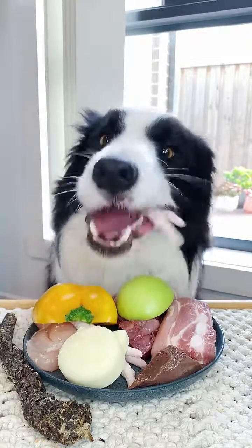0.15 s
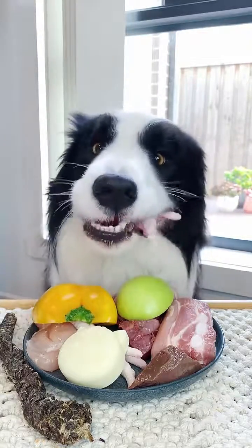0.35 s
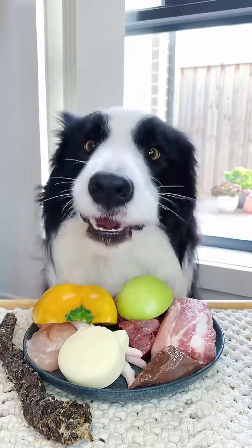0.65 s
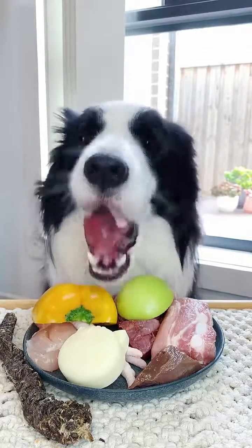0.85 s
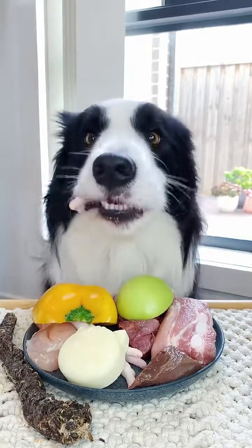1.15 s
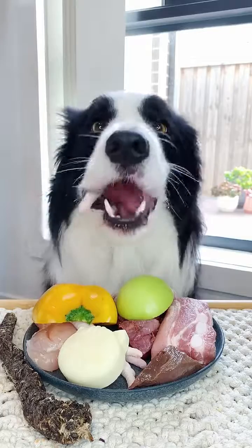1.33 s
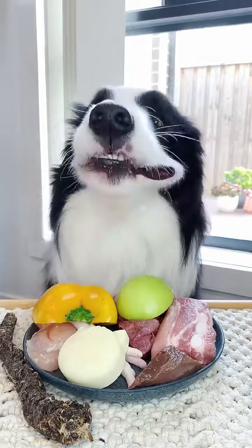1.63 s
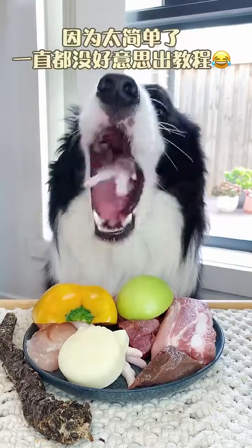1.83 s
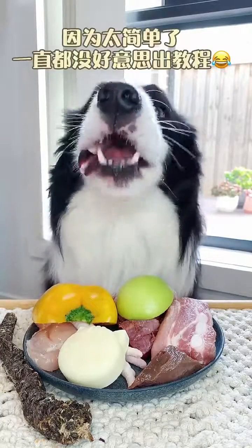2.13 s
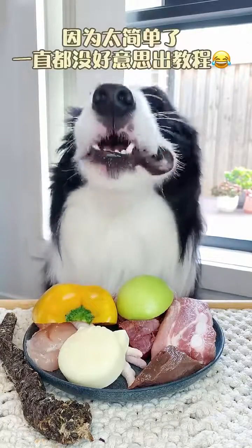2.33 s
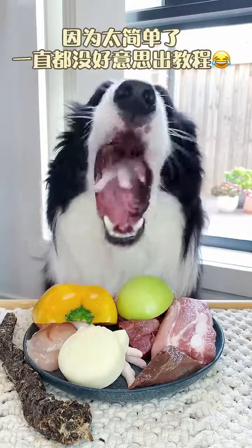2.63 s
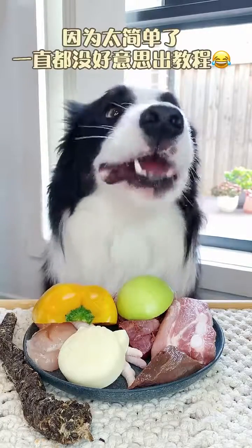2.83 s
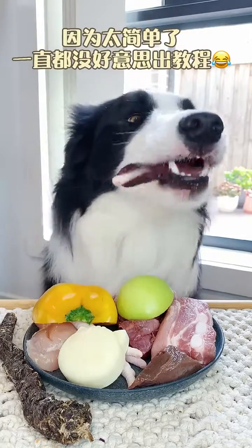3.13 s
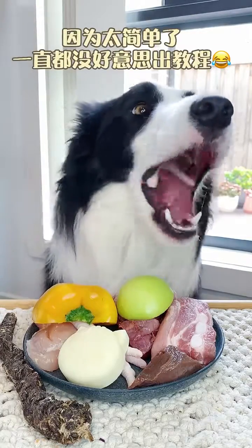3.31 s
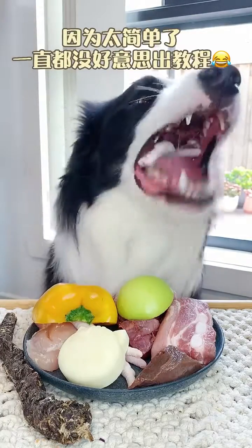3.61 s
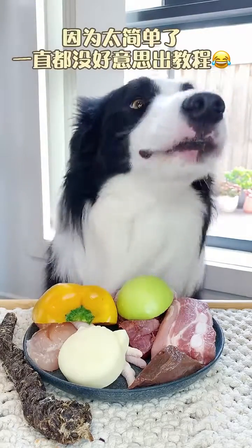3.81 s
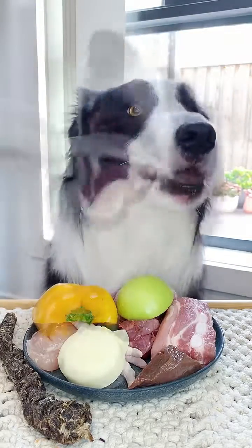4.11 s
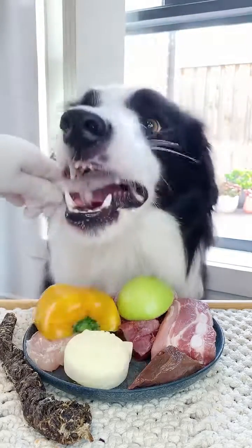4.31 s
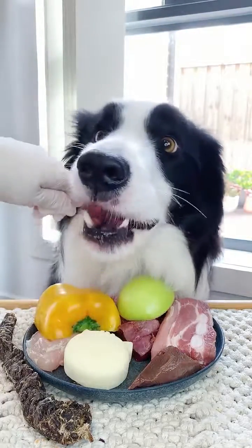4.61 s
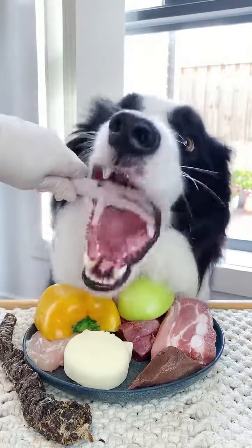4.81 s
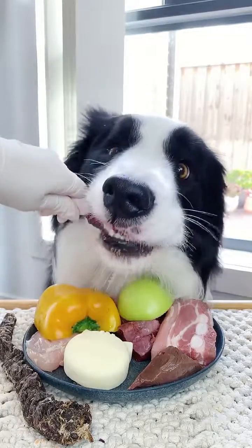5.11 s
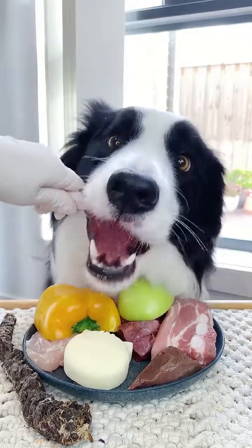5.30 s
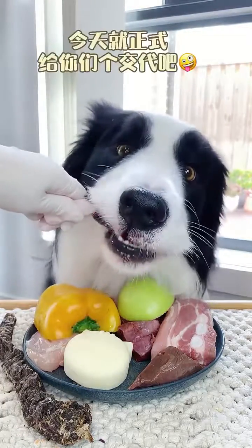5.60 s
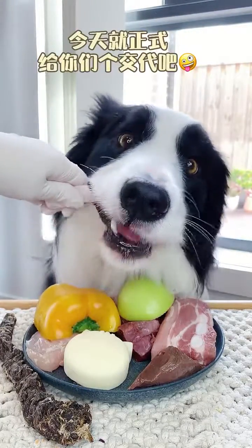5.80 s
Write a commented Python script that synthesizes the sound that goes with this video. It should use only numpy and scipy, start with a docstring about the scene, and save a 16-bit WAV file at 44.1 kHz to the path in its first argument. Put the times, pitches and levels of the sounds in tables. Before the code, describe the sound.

A dog eats raw meaty bone indoors, mouth almost against the microphone. Rapid wet cracks come in irregular clusters, with hard snaps early and near one second, then steady crunching through the middle. Low jaw thuds and rumbles shake the microphone, saliva crackles and squelches, and nose breath hisses between bites. Loud open-mouth cracks ring briefly off hard walls. The last second has a few bright snaps.

```python
"""Dog chewing raw meat and bones

Indoors, with one microphone very close to the dog's head. Bone and gristle crack as damped rings and
noise bursts; the jaw rumbles and thuds as low noise and low rings. Air through the nose is filtered noise,
wet tissue crackles in small pops, slurps are runs of bubbles and whistles are gliding sines.
Cracks made with the mouth open fill the hard-walled room; a limiter squeezes loud moments."""
import sys
import numpy as np
from scipy import signal
from scipy.fft import rfft, irfft, next_fast_len
from scipy.io import wavfile
from scipy.ndimage import uniform_filter1d, minimum_filter1d, map_coordinates

SR = 44100
rng = np.random.default_rng(int(sys.argv[2]) if len(sys.argv) > 2 else 0)


def invert_db(level):
    """Linear amplitude ratio for a level in decibels (20 dB per decade), elementwise."""
    return 10 ** (np.asarray(level, dtype=float) / 20)


def wav_record(signal):
    """Record a signal, one row per channel, as 16-bit PCM in the file named by sys.argv[1]."""
    frames = np.transpose(np.atleast_2d(signal))
    bounded = np.clip(frames, -1, 1)
    # unit amplitude maps onto the largest positive 16-bit level
    quanta = np.round(bounded * 32767).astype(np.int16)
    wavfile.write(sys.argv[1], SR, quanta)


N = 262395


def unit(x):
    """Scale to rms 1."""
    return x / np.sqrt(np.mean(x ** 2) + 1e-20)


def curves(rows):
    """One value per sample for each column after the time."""
    s, *columns = np.transpose(rows)
    return [np.interp(np.arange(N) / SR, s, column) for column in columns]


def wobble(rate):
    """A smooth random curve, rate knots a second."""
    knots = rng.standard_normal(int(N * rate / SR) + 4)
    return map_coordinates(knots, [np.arange(N) * rate / SR])


def spans(s, end):
    """1 from s to end, with 4 ms edges."""
    return np.interp(np.arange(N) / SR, [s - .004, s, end, end + .004], [0, 1, 1, 0])


def coloured(x, spectrum):
    """x filtered by (Hz, dB) points on a log frequency axis."""
    size = next_fast_len(x.shape[-1] + 8192)
    hz, db = np.transpose(spectrum)
    bins = np.fft.rfftfreq(size, 1 / SR)
    gain = invert_db(np.interp(np.log(bins + 1), np.log(hz + 1), db))
    return irfft(rfft(x, size) * gain, size)[..., :x.shape[-1]]


def rush(spectrum, depth):
    """Noise of rms 1 with shallow patches of random gain in time and frequency, depth in dB rms."""
    z = signal.stft(rng.standard_normal(N + 512), nperseg=256)[2]
    field = uniform_filter1d(rng.standard_normal(z.shape), size=4, axis=0)
    field = uniform_filter1d(field, size=8, axis=1)
    patchy = signal.istft(z * invert_db(depth * unit(field)), nperseg=256)[1][:N]
    return unit(coloured(patchy, spectrum))


def rings(s, size, hz, cycles, phase, length):
    """Damped sines, one per row, that fall 60 dB in a number of cycles; summed at their times."""
    turn = hz[:, None] * np.arange(length) / SR
    decay = invert_db(-60 * turn / cycles[:, None])
    rows = size[:, None] * np.sin(2 * np.pi * turn + phase[:, None]) * decay
    at = np.round(s * SR).astype(int)[:, None] + np.arange(length)
    return np.bincount(at.ravel(), rows.ravel(), N + SR)[:N]


def grains(hz, spread, cycles, scatter_db, count, length):
    """Random small pops, together of rms 1: log-normal pitch, a few much bigger than the rest."""
    when, chance, sign = rng.random((count, 3)).T
    pitch = np.clip(hz * np.exp(spread * rng.standard_normal(count)), 60, 15000)
    size = invert_db(-scatter_db * np.log(chance + .03))
    phase = np.pi * np.round(sign)  # either polarity
    return unit(rings(when * N / SR, size, pitch, np.full(count, cycles), phase, length))


def swells(s, db, rise_s, fall_s, base_db):
    """Level in dB of a base plus swells that rise and fall by 20 dB in 1 ms more than the given times."""
    t = np.arange(0, N + 64, 64) / SR
    late = t - s[:, None]
    rise = np.reshape(rise_s + 1e-3, (-1, 1))
    down = np.where(late < 0, -late / rise, late / (fall_s + 1e-3))
    power = (invert_db(db[:, None] - 20 * down) ** 2).sum(axis=0)
    return 10 * np.log10(np.interp(np.arange(N) / SR, t, power) + invert_db(base_db) ** 2)


# Swells of low rumble at the close microphone. Each row: time of the peak in seconds,
# level in dB, rise time over 20 dB in seconds (clipped to 0.02-0.25 s).
RUMBLE_SWELLS = [(.09, -21, .08), (.18, -15, .05), (0.239, -21, -1.7), (.565, -19, -1.5), (.68, -13, 5),
                 (.885, -12, -0.3), (.96, -19, -1), (1.003, -10.5, 0), (1.05, -18, .05), (1.481, -16, -6),
                 (1.564, -15.5, .12), (1.849, -13, -1.3), (1.941, -10.5, -1.5), (1.995, -13.5, 0.2),
                 (2.26, -21, -1.3), (2.39, -13, .2), (2.66, -13.5, -1.1), (2.734, -8.5, 0),
                 (2.96, -17, -0.2), (3.025, -7.5, 0.1), (3.418, -6.5, -0.1), (3.59, -10, -0.06),
                 (3.64, -13.5, 0.4), (3.688, -8, .1), (3.83, -14, -0.1), (3.89, -14.5, 3), (3.96, -19, 0.5),
                 (4.119, -9.5, .15), (4.22, -12.5, -1), (4.32, -9.5, 0.5), (4.41, -18, -0.4),
                 (4.83, -15, -0.1), (4.89, -11, -0.8), (4.93, -9.5, 13), (5.0, -17.5, 11), (5.14, -23, 2.5),
                 (5.429, -7.5, .2), (5.6, -16.5, .2), (5.85, -23.5, -7)]
RUMBLE_FALL_S, RUMBLE_BASE_DB = 0.052, -33.5  # time to fall 20 dB, level under the swells


def rumble_level():
    """Jaw rumble level in dB: overlapping swells above a faint steady base."""
    s, db, rise_s = np.transpose(RUMBLE_SWELLS)
    return swells(s, db, np.clip(rise_s, .02, .25), RUMBLE_FALL_S, RUMBLE_BASE_DB)


# Thuds of the jaw, close to the microphone. Each row: start in seconds, relative level in dB, pitch in Hz.
THUDS = [(0.232, -9, 184), (0.658, -17.5, 248), (0.74, -14, 440), (0.882, -15.5, 236), (1.035, -9.5, 207),
         (1.133, -8.5, 274), (1.176, -14.5, 503), (1.344, -16.5, 403), (1.628, -17, 377), (1.841, -10, 243),
         (2.046, -10, 262), (2.091, -15, 280), (2.373, -12.5, 173), (2.725, -11, 227), (2.745, -10.5, 137),
         (3.007, -9.5, 123), (3.146, -6.5, 252), (3.175, -14.5, 275), (3.675, -16, 178),
         (3.713, -14.5, 290), (3.773, -9.5, 262), (3.81, -13.5, 250), (3.884, -12.5, 340),
         (3.947, -15.5, 168), (4.205, -14.5, 146), (4.337, -12.5, 270), (4.402, -6.5, 242),
         (4.537, -11.5, 350), (4.969, -18, 168), (4.993, -16, 153), (5.009, -11.5, 244), (5.109, -12, 324),
         (5.128, -12.5, 270), (5.15, -14, 415), (5.429, -10, 103), (5.662, -16, 400), (5.846, -21, 119)]
# Spectrum of the microphone being shaken. Each row: frequency in Hz, relative level in dB per Hz.
RUMBLE = [(7.1, -25), (12, 3.5), (29, -1), (58, -4.5), (108, -18.5), (239, -29), (300, -84), (660, -120)]


def jaw():
    """The working jaw shakes the microphone in slow lumps; teeth closing on meat give short thuds."""
    s, db, hz = np.transpose(THUDS)
    thuds = rings(s, invert_db(db + 7), hz, np.full(len(s), 6.5), np.full(len(s), np.pi), length=3000)
    rumble = rush(RUMBLE, depth=0)
    # the rumble's own random swings in level are evened out
    rumble /= np.sqrt(0.11 + uniform_filter1d(rumble ** 2, size=2000))
    return invert_db(rumble_level()) * unit(rumble) + thuds


# Moments when the room's ring, air and hiss drop away. Each row: start in seconds, end in seconds,
# change in dB.
DIPS = [(0.115, 0.145, -12), (1.086, 1.109, -9.5), (1.415, 1.477, -5), (2.454, 2.517, -7.5),
        (2.764, 2.925, -4), (3.417, 3.546, -13), (3.693, 3.704, -20), (3.952, 4.075, -7.5),
        (4.345, 4.362, -8.5)]


def dips():
    """The brief drops in level, dB."""
    return sum(db * spans(s, end) for s, end, db in DIPS)


# Breath at the muzzle between the breaks. Each row: time in seconds, relative airflow level in dB,
# relative hiss level in dB.
BREATH = [(0.0, -24.5, -46), (0.36, -30.5, -38.5), (0.76, -32.5, -53), (1.21, -26, -46), (1.85, -35, -49.5),
          (2.22, -25, -40), (2.73, -32, -46), (3.0, -27, -37), (3.17, -33, -55), (3.46, -24, -35.5),
          (3.69, -37.5, -42.5), (4.09, -28, -43.5), (4.37, -27, -34.5), (4.72, -28.5, -40),
          (5.07, -33, -37), (5.3, -32, -46.5), (5.72, -33, -44), (5.95, -33, -45.5)]
# swells around each crack: level against the crack, then 20 dB rise and fall times
AIR_SWELL_DB, AIR_RISE_S, AIR_FALL_S = -14, 0.016, 0.014
HISS_SWELL_DB, HISS_RISE_S, HISS_FALL_S = -11, 0.018, 0.041


def flow():
    """Air and hiss levels in dB: the breath, plus airy noise and hiss that swell around each crack."""
    s, db, hz, treble_db = np.transpose(CRACKS)
    air_db, hiss_db = curves(BREATH)
    air_db = swells(s, db + AIR_SWELL_DB, AIR_RISE_S, AIR_FALL_S, air_db + 2.0)
    hiss_db = swells(s, db + treble_db + HISS_SWELL_DB, HISS_RISE_S, HISS_FALL_S, hiss_db + 5.5)
    return air_db + dips(), hiss_db + dips()


# Spectra at the close microphone: air in the nose, hiss of air and spit, squelching flesh.
# Each row: frequency in Hz, relative level in dB per Hz.
NOSE = [(290, -28), (500, -21), (795, -40), (938, -1), (1440, 4.5), (2590, 8.5), (3570, 9), (5680, -16),
        (7000, 4), (9100, -50), (15400, -120)]
HISS = [(3500, -38), (4290, 0.5), (6120, -3.5), (7130, -2), (10800, -18), (15100, -18), (16000, -32)]
FLESH = [(53, -8), (90, 19), (172, 1.5), (249, 12.5), (400, 0.5), (658, -12), (1100, -12), (1430, -7.5),
         (2420, -120)]


def breath_and_spit():
    """Air rushes through nose and mouth; saliva and tissue crackle with it and squelch with the rumble."""
    air_db, hiss_db = flow()
    wet_db = 0.71 * rumble_level() + 0.32 * air_db - 9.5
    puff_db = 2 * wobble(35) + 2 * wobble(9)
    air = invert_db(air_db - 15.5 + puff_db) * rush(NOSE, depth=2)
    hiss = invert_db(hiss_db - 11.0 + puff_db) * rush(HISS, depth=0.85)
    squelch = invert_db(wet_db + 3 * wobble(40)) * rush(FLESH, depth=1.5)
    crackle = grains(hz=2100, spread=0.4, cycles=11, scatter_db=5, count=3500, length=260)
    # a bursting film of saliva also ticks in the treble
    ticks = invert_db(hiss_db - 4.5) * unit(np.abs(crackle) * rush(HISS, depth=0))
    smacks = grains(hz=930, spread=0.463, cycles=9.3, scatter_db=3.5, count=2500, length=400)
    smacks *= invert_db(wet_db - 7.0)
    return air + hiss + squelch + invert_db(air_db - 6.5) * crackle + ticks + smacks


# Breaks of bone and gristle inside the mouth. Each row: time in seconds, relative level in dB,
# mouth ring in Hz, splinter treble in dB against that level.
CRACKS = [(0.031, -16, 1860, -12), (0.0517, -15.5, 1960, -25), (0.071, -11, 2460, -21),
          (0.0858, -2, 1220, -22), (0.0942, -12.5, 1110, -35), (0.1182, -3.5, 1470, -40),
          (0.1738, -9, 1670, -17), (0.204, -14.5, 1800, -24), (0.2338, -3.5, 2200, -17.5),
          (0.2692, -16.5, 2090, -5.5), (0.296, -11, 3820, -41), (0.308, -14, 2100, -2),
          (0.326, -14.5, 1510, -9), (0.347, -8, 1950, -5), (0.355, 3, 3200, -22), (0.3654, -15, 2200, -9),
          (0.3724, -23, 2280, 6), (0.379, -7, 2540, -7), (0.386, 4, 2260, -18), (0.3906, -3, 4200, -49),
          (0.563, -6, 1200, -65), (0.6774, -13.5, 1490, -36), (0.732, -10.5, 2040, -25),
          (0.7399, -13.5, 1270, -26), (0.8049, -7, 1530, -28), (0.886, -9.5, 1090, -74),
          (0.9507, -18, 1170, -9), (0.9957, -13.5, 1230, -10), (1.0529, -1, 4250, -21),
          (1.085, -10, 2310, -18), (1.1235, 0, 3950, -35), (1.132, -6, 1130, -8), (1.1913, 2, 3660, -47),
          (1.1986, 0, 3500, -43), (1.2502, -10, 950, -31), (1.3489, -10.5, 3300, -51),
          (1.404, -5, 1060, -3.5), (1.416, -2, 1120, -23), (1.501, -14.5, 2370, 1.5),
          (1.5094, -0.5, 1500, -26), (1.564, -11, 1800, -16), (1.596, -2.5, 1780, -12.5),
          (1.612, -8, 1520, -44), (1.6384, -3, 1527, -18), (1.6582, -11, 1370, -51),
          (1.7309, -6, 1390, -22), (1.797, -16.5, 920, -36), (1.8174, -12.5, 3770, -47),
          (1.861, -15, 5630, -1.5), (1.9377, -7, 750, -17), (1.9814, -8, 1130, -13),
          (2.0093, -1, 2040, -11.5), (2.027, -2, 2610, -12.5), (2.0465, -2.5, 2770, -17.5),
          (2.092, -10, 2690, -12), (2.2551, -10.5, 1265, -40), (2.2857, -21, 6800, 10.5),
          (2.313, -14, 814, -39), (2.324, -10, 1530, -51), (2.3716, -11, 4500, -5), (2.378, -9, 1280, -17),
          (2.4047, -4.5, 1190, -48), (2.425, -12, 4350, -25), (2.4431, -2, 1340, -28),
          (2.466, -9, 2590, -41), (2.5376, -13, 1386, 1), (2.6146, -11, 3440, -45), (2.671, -12, 696, -37),
          (2.6772, -7, 820, -55), (2.725, -12.5, 550, -21), (2.749, -11, 1450, -8.5),
          (2.919, -11.5, 1320, -37), (2.9945, -15, 1410, -7), (3.0083, -10.5, 1470, -28),
          (3.067, -3, 1390, -5.5), (3.1251, -10.5, 1300, -5), (3.143, 2.5, 2500, -9.5),
          (3.16, -6, 2600, -43), (3.2463, -16.5, 1790, 0.5), (3.315, -10, 2130, -18),
          (3.322, -10.5, 1370, -4.5), (3.54, -10, 740, -65), (3.547, -10, 2100, -48),
          (3.679, -20, 4550, -7), (3.7145, -14.5, 1290, -4), (3.719, -15, 1250, -7),
          (3.7484, -3, 1810, -7.5), (3.7658, 1, 2580, -9.5), (3.7771, -8, 1760, -27),
          (3.8115, -3.5, 2000, -18), (3.855, -8, 1050, -53), (3.8933, -13.5, 1120, -40),
          (3.9515, -2, 790, -31), (3.9821, -12.5, 1000, -77), (4.019, -15.5, 676, -47),
          (4.076, -19, 2960, -9), (4.0986, -3, 742, -19), (4.183, -15.5, 1900, -1.5),
          (4.206, -13.5, 1980, -12), (4.2263, -15.5, 1410, -10), (4.2556, -7.5, 1840, -34),
          (4.264, -20.5, 6000, 0), (4.2865, -11, 1430, -31), (4.3002, -10, 1150, -11),
          (4.312, -6, 1730, -36), (4.3354, -12.5, 1830.0, -7), (4.374, -13.5, 1840, -9.5),
          (4.4025, -10, 950, -10), (4.438, -11, 1930, -6), (4.4459, -3.5, 960, -12),
          (4.472, -5, 2000.0, -10), (4.4799, -6.5, 1950, -13), (4.51, -15, 1610, -4.5),
          (4.539, -6, 1920, -9.5), (4.731, -16, 1610, -30), (4.899, -18, 1200, -4),
          (4.943, -10.5, 970, -15), (4.9682, -14, 1380, -9), (4.9924, -16.5, 2980, -6),
          (5.0099, -16, 1420, -19), (5.04, -11.5, 1530, -4), (5.056, -18, 900, -20),
          (5.069, -9.5, 3970, -15), (5.083, -14, 2450, -9), (5.103, -1.5, 5100, -24), (5.11, -8, 4200, -22),
          (5.1234, -3, 4030, -29), (5.147, -12.5, 2000, -13), (5.176, -8.5, 3820, -21),
          (5.222, -14.5, 3730, -12.5), (5.473, -15.5, 950, -22), (5.4799, -15.5, 2980, -4),
          (5.555, 3, 4500, -11), (5.5797, 1, 4100, -22), (5.6033, -4, 3270, -10), (5.6332, -11, 2820, -21),
          (5.6618, -12, 1800, -6), (5.669, -8, 4070, -4.5), (5.7148, -10.5, 1660, -12),
          (5.7401, -8.5, 1560, -13), (5.7947, -9.5, 2730, -19)]
# Spectra of the splinters and of the body of a break, heard close.
# Each row: frequency in Hz, relative level in dB per Hz.
SPLINTER = [(2500, -13), (5000, -1.5), (8000, -0.5), (10000, -11), (15500, -20.5), (17000, -45)]
BONE = [(290, -81), (500, 13.5), (685, -10), (938, -2.5), (1270, 4), (1980, 8.5), (3950, 3), (9000, -25),
        (11700, -73), (19800, -120)]
DULL_SHARE = 0.21  # how far the snap, upper ring and body of a break follow its treble
SNAP_DB, SNAP_HZ = 5, 4200  # sharp click at the first instant of a break; centre of its random pitch


def cracks():
    """Each break rings the mouth at its present pitch and spits a short burst of splinter noise."""
    s, db, hz, treble_db = np.transpose(CRACKS)
    chance = rng.standard_normal((len(s), 4)).T
    one = np.ones(len(s))
    dull_db = DULL_SHARE * treble_db
    polarity = np.pi * (chance[0] > 0)
    mouth = rings(s, invert_db(db + 3.5), hz, 11 * (hz / 2000) ** .5, polarity, length=600)
    # the wet cavity keeps a fainter ring going for longer
    mouth += rings(s, invert_db(db - 14.0), hz, 45 * (hz / 2000) ** .5, polarity, length=1000)

    # the broken piece rings higher
    piece_hz = hz * 2.115 * np.exp(0.29 * chance[2])
    piece_size = invert_db(db + dull_db + 3 * chance[1])
    piece = rings(s, piece_size, piece_hz, 16 * one, np.pi * (chance[3] > 0), length=400)

    # wet fibres let go one by one: four smaller smacks scatter around the break, near the mouth's pitch
    lag, size, bend = rng.random((len(s), 12)).T.reshape(3, -1)
    smack_s = np.tile(s, 4) + .016 * lag - .005
    smack_size = invert_db(np.tile(db, 4) - 2.5 - 17.3 * size)
    smack_hz = np.tile(hz, 4) * np.exp(.5 * (bend - .5))
    smacks = rings(smack_s, smack_size, smack_hz, 12 + 0 * lag, 0 * lag, length=500)

    # the break also jolts the skull: one short low push
    jolt_hz = 380 * np.exp(0.41 * chance[1])
    jolt = rings(s, invert_db(db - 7.0), jolt_hz, 4.4 * one, np.pi * one, length=600)
    snap_hz = SNAP_HZ * np.exp(0.33 * chance[2])
    snap = rings(s, invert_db(db + SNAP_DB + dull_db), snap_hz, 3 * one, np.pi * one, length=60)

    # fibres start to tear 2 ms before the break, then the splinters die away
    start = np.round((s - .002) * SR).astype(int)
    t = np.arange(SR // 30) / SR - .002
    tear = 1.49 * np.exp(t / 0.00062)
    fade = np.where(t < 0, tear, invert_db(-60 * t / 0.013) + 0.14 * invert_db(-60 * t / 0.05))
    spit = signal.fftconvolve(np.bincount(start, invert_db(db + treble_db + 1.0), N), fade)[:N]
    body = signal.fftconvolve(np.bincount(start, invert_db(db - 4 + dull_db), N), fade)[:N]
    grit = unit(invert_db(5 * wobble(900)))  # the break goes fibre by fibre, not smoothly
    burst = grit * (spit * rush(SPLINTER, depth=0.93) + body * rush(BONE, depth=0.78))
    return mouth + piece + smacks + jolt + snap + burst


# Decay of the hard-walled room. Each row: frequency in Hz, time to fall 60 dB in seconds.
ROOM = [(500, 0.51), (2000, 0.95), (5000, 0.81), (9000, 0.74), (15000, 0.21)]


def room(x):
    """Each frequency of the room's answer dies at its own speed; every quarter second meets a new tail."""
    hz, t60 = np.transpose(ROOM)
    step = SR // 4
    delay = 300  # samples
    wet = np.zeros(N + 2 * SR)
    for at in range(0, N, step):
        f, t, z = signal.stft(rng.standard_normal(SR), SR, nperseg=256)
        decay = invert_db(-60 * t / np.interp(f, hz, t60)[:, None])
        tail = signal.istft(z * decay, SR, nperseg=256)[1]
        answer = signal.fftconvolve(x[at:at + step], tail / np.linalg.norm(tail))
        wet[at + delay:at + delay + len(answer)] += answer
    return wet[:N]


# How much of a crack escapes the open mouth. Each row: time in seconds, level sent to the room in dB.
MOUTH_OPENING = [(0, -37), (.26, -36), (.36, -12), (.61, -16), (1.18, -12), (1.6, -19.5), (2.02, -7.5),
                 (2.4, -19), (2.83, -15), (3.14, -9), (3.4, -9), (3.76, -19), (4.2, -43), (4.46, -10),
                 (4.9, -17), (5.12, -11.5), (5.39, -29), (5.58, -17), (5.95, -9.5)]


def escaping(near):
    """The open mouth lets the cracks out into the room, whose ring dips briefly at times."""
    return room(invert_db(curves(MOUTH_OPENING)[0]) * near) * invert_db(dips())


# Slurps at the lips, close to the microphone. Each row: start in seconds, end in seconds,
# first pitch in Hz, last pitch in Hz, relative level in dB.
SLURPS = [(1.388, 1.402, 2540, 2200, -18), (0.653, 0.702, 920, 1580, -32), (0.868, 0.896, 1810, 1210, -27),
          (1.476, 1.559, 1480, 1740, -30.5), (2.298, 2.384, 4070, 4500, -30),
          (3.515, 3.591, 855, 2240, -29), (3.543, 3.616, 3020, 5640, -28), (5.529, 5.56, 2500, 4030, -28)]


def slurps():
    """Tongue and lips peel off wet food in dense bubbles, gliding in pitch as the gap changes."""
    out = np.zeros(N)
    for s, end, first_hz, last_hz, db in SLURPS:
        # 600 bubbles a second, at most 60
        part, size, bend, phase = rng.random((60, 4)).T[:, :int(600 * (end - s))]
        hz = first_hz * (last_hz / first_hz) ** part * np.exp(.5 * (bend - .5))
        when = s + part * (end - s)
        out += rings(when, invert_db(db + 12 - 20.0 * size), hz, 22 + 0 * hz, 2 * np.pi * phase, length=600)
    return out


# Whistles of the nearly closed mouth on its cavity, which the tongue reshapes. Each row:
# start in seconds, end in seconds, first pitch in Hz, last pitch in Hz, level in dB before the flutter.
WHISTLES = [(1.562, 1.668, 1420, 1320, -29), (2.479, 2.57, 1450, 1420, -33.5),
            (2.582, 2.596, 1450, 1434, -31), (2.685, 2.736, 1470, 1395, -31),
            (3.537, 3.575, 2050, 2240, -26.5), (4.807, 4.817, 960, 1020, -30.5),
            (4.819, 4.832, 1450, 1560, -32), (4.845, 4.89, 1450, 1650, -31),
            (5.29, 5.375, 1450, 1560, -35.5), (5.346, 5.403, 900, 1063, -34)]
WAVER_HZ = 36.1  # scale of a whistle's random pitch wander


def whistles():
    """Air past wet lips sounds one mouth resonance; its pitch glides and wavers, its level flutters."""
    flutter = invert_db(3 * wobble(60)) * (1 + .7 * wobble(350))
    waver = WAVER_HZ * wobble(150)
    t = np.arange(N) / SR
    out = np.zeros(N)
    for s, end, first_hz, last_hz, db in WHISTLES:
        hz = np.interp(t, [s, end], [first_hz, last_hz]) + waver
        out += invert_db(db) * spans(s, end) * np.sin(2 * np.pi * np.cumsum(hz) / SR)
    return flutter * out


def scene():
    """Everything reaches one close microphone."""
    near = cracks()
    far = escaping(near)
    return (near + far + jaw() + breath_and_spit() + whistles() + slurps())[None]


def top_cut(x):
    """Nothing passes above the cut-off."""
    return signal.sosfilt(signal.butter(12, 16680, fs=SR, output="sos"), x)


def record(dry):
    """A fast limiter holds peaks under full scale; the band ends near 16 kHz."""
    need = np.minimum(1, .99 / (np.abs(dry) + 1e-9))
    gain = uniform_filter1d(minimum_filter1d(need, size=120, axis=1), size=60, axis=1)
    mix = coloured(dry * gain, [(15800, -0.5), (16100, -16), (16600, -24), (16750, -70)])
    return top_cut(mix)


dry = scene()
out = record(dry)
wav_record(out)
```